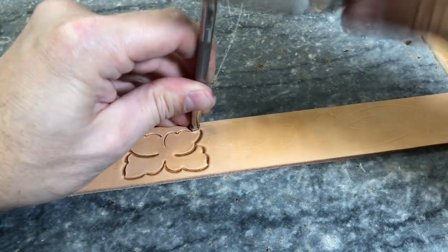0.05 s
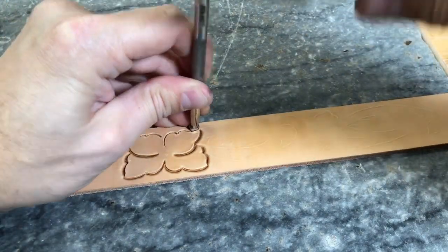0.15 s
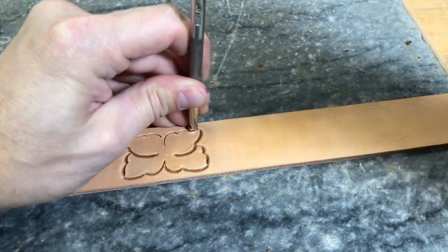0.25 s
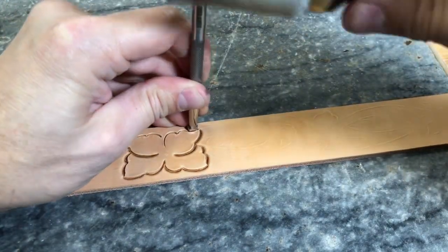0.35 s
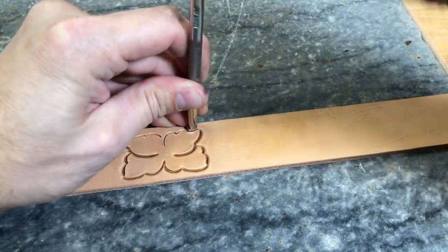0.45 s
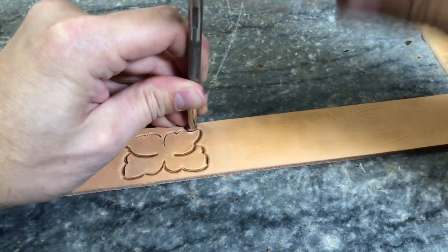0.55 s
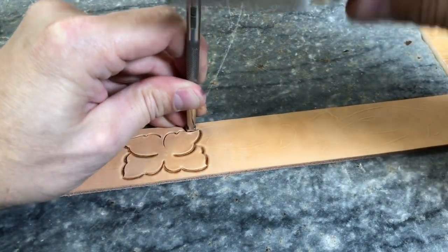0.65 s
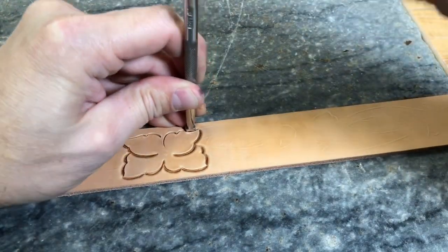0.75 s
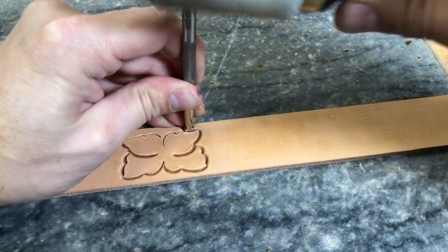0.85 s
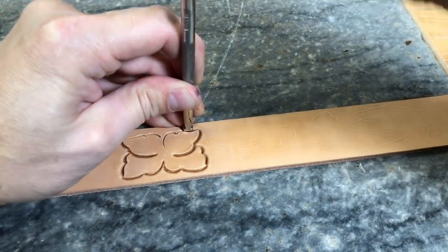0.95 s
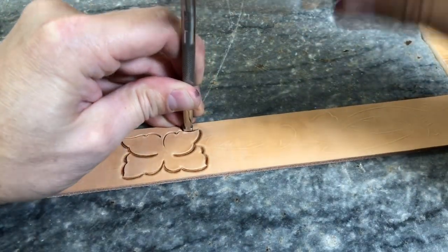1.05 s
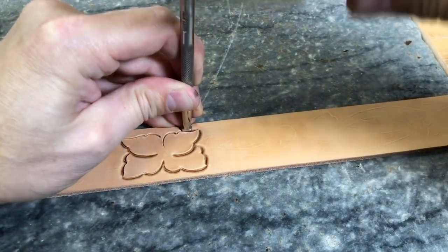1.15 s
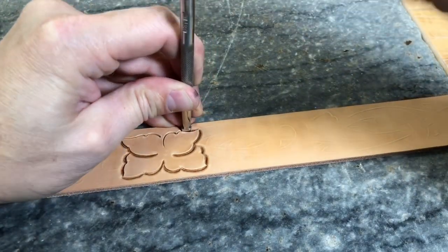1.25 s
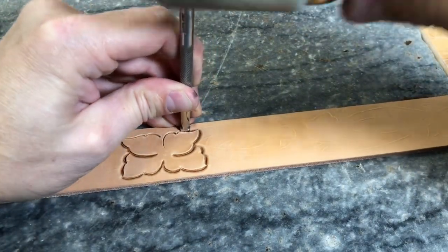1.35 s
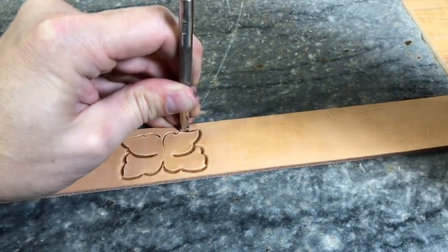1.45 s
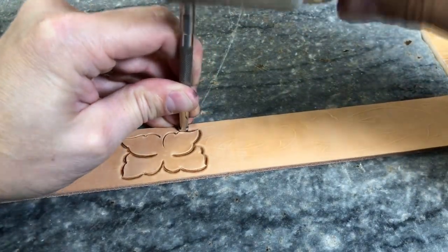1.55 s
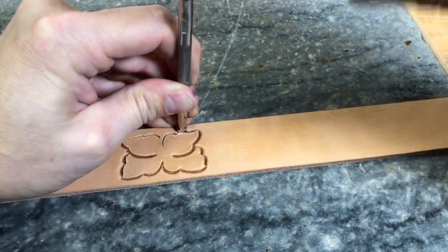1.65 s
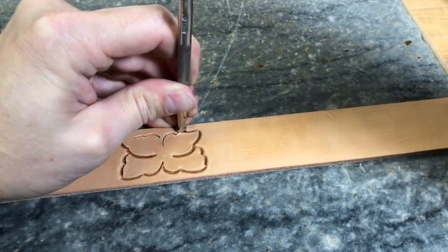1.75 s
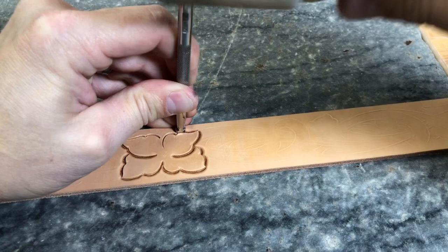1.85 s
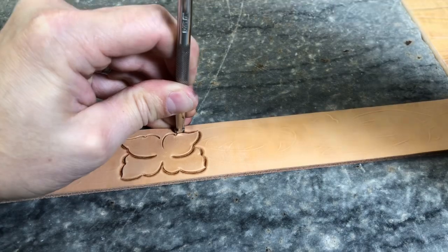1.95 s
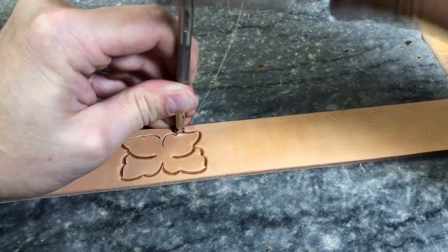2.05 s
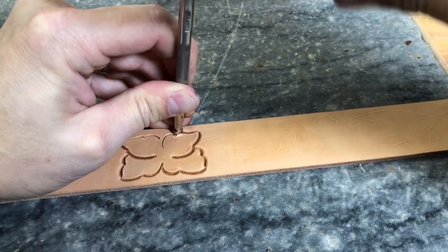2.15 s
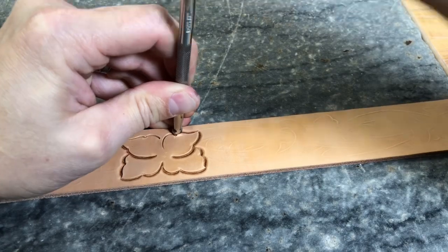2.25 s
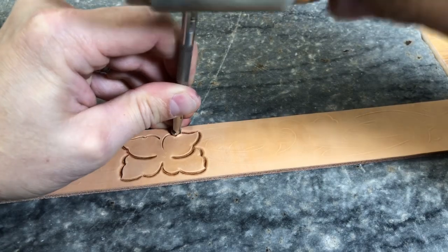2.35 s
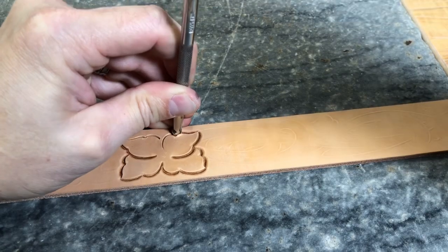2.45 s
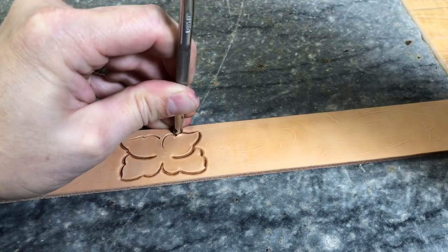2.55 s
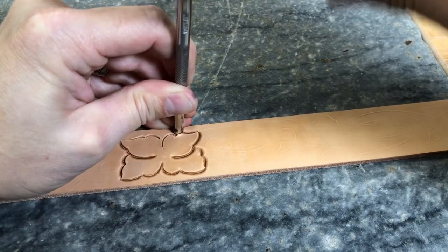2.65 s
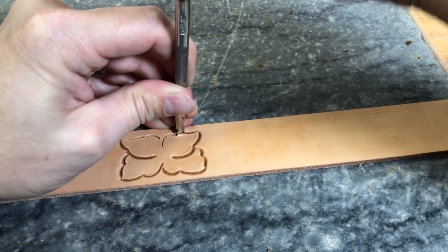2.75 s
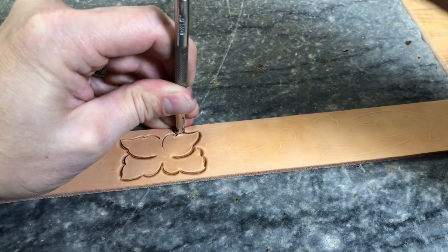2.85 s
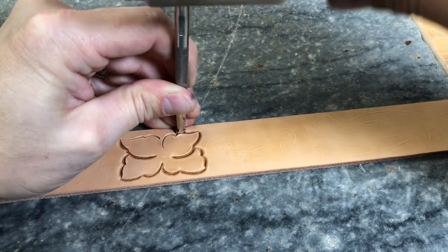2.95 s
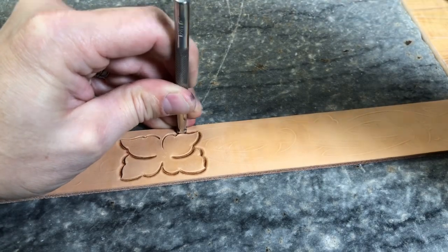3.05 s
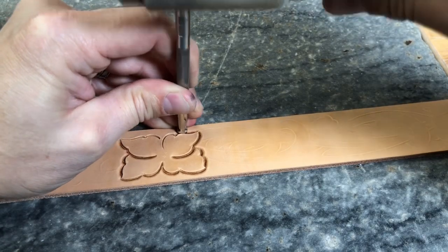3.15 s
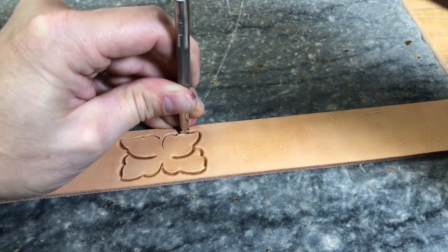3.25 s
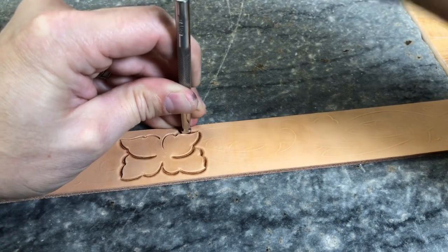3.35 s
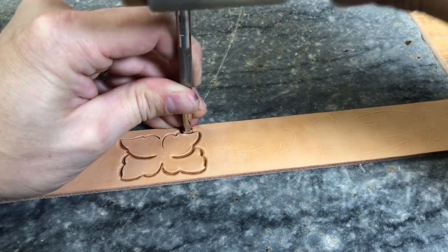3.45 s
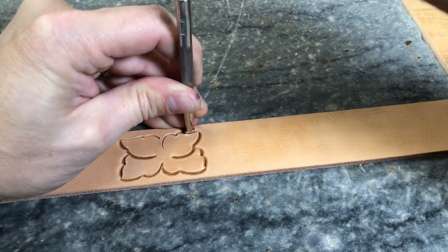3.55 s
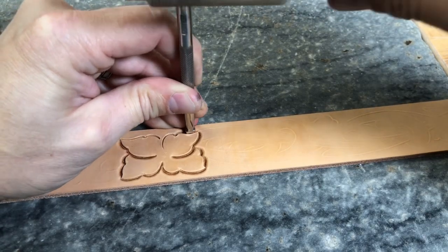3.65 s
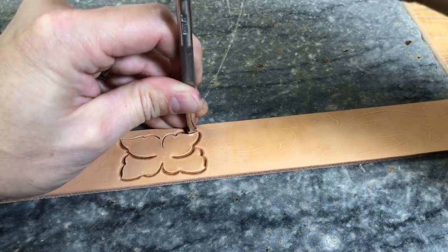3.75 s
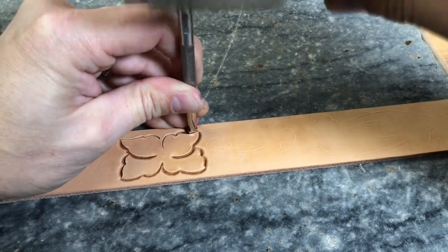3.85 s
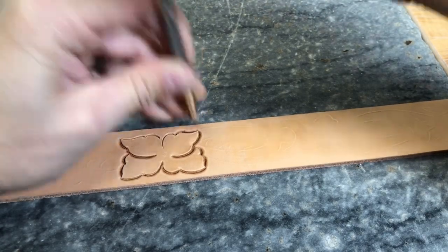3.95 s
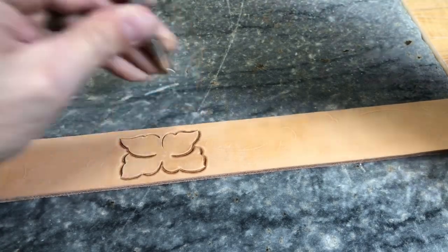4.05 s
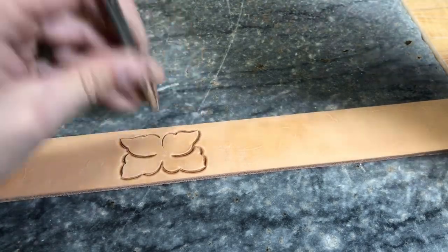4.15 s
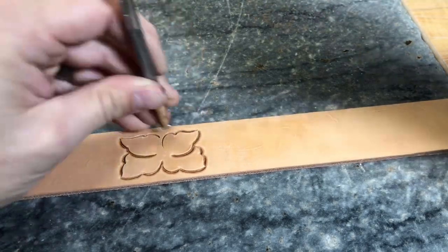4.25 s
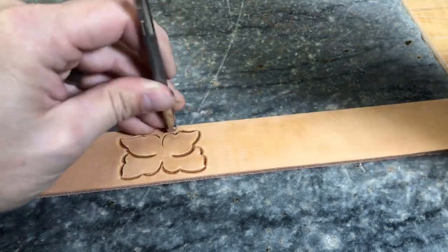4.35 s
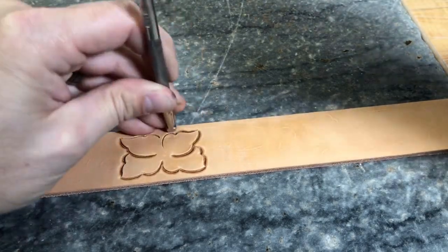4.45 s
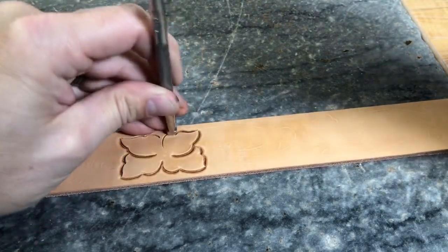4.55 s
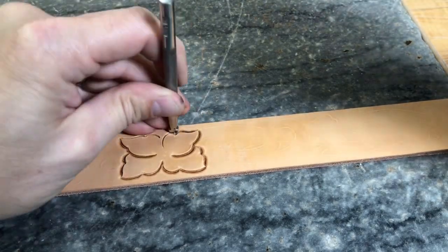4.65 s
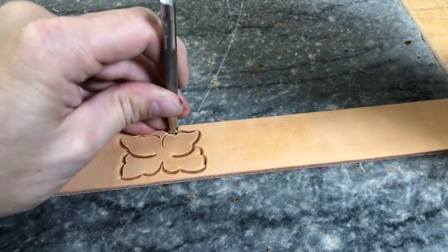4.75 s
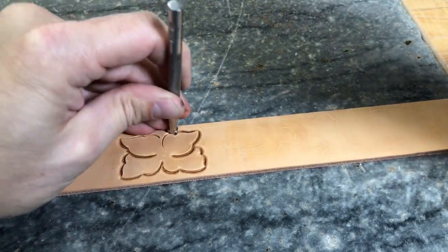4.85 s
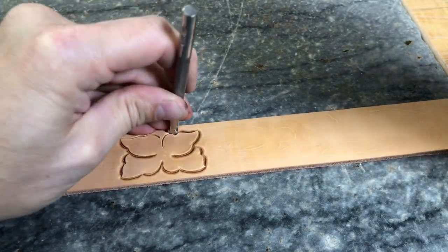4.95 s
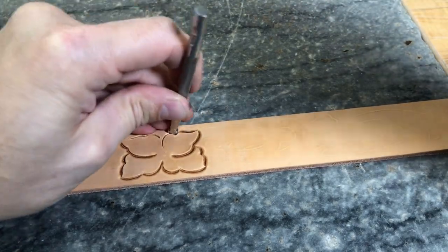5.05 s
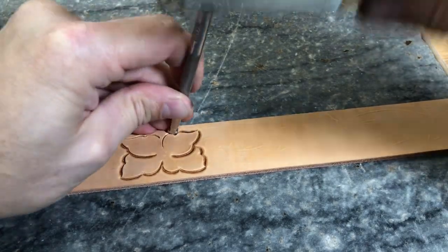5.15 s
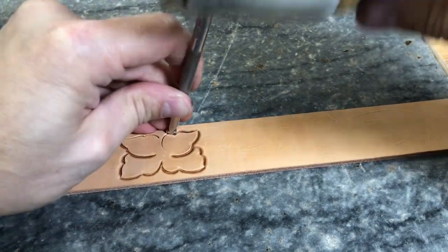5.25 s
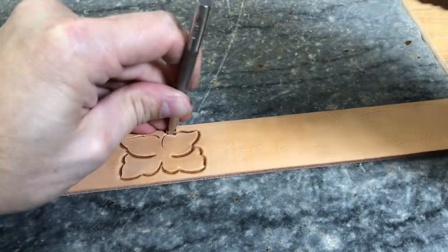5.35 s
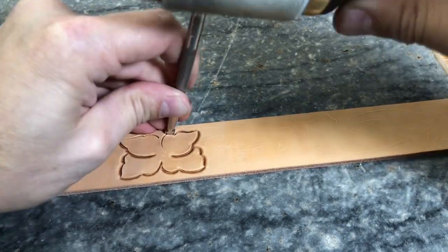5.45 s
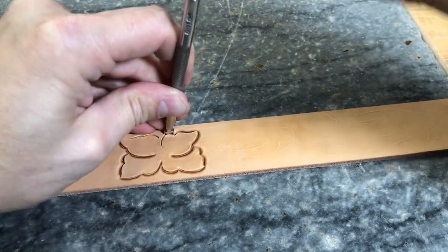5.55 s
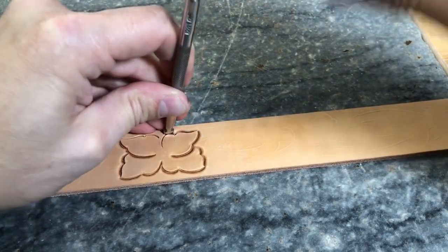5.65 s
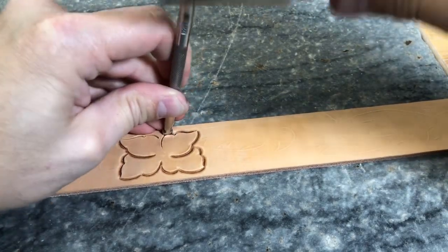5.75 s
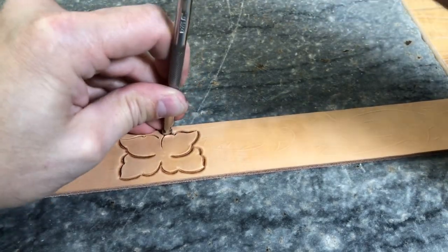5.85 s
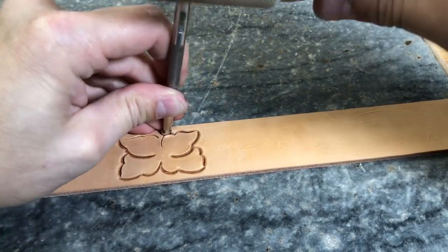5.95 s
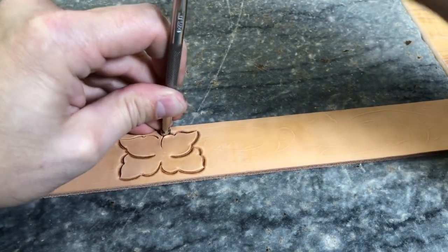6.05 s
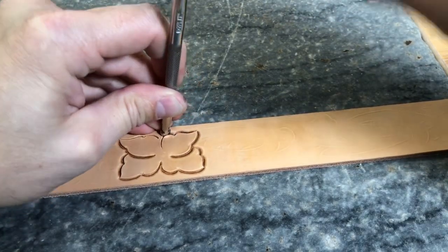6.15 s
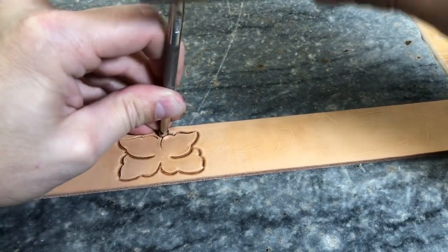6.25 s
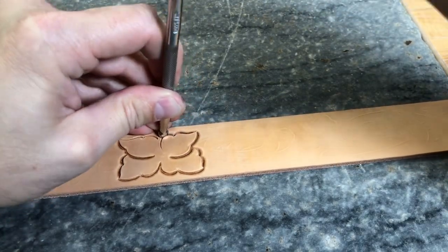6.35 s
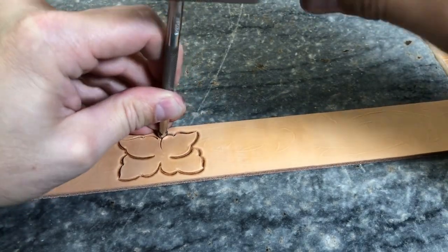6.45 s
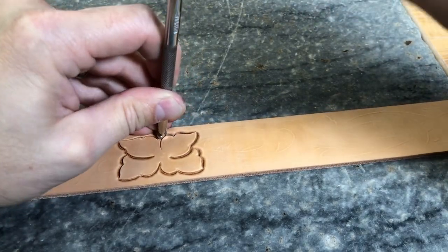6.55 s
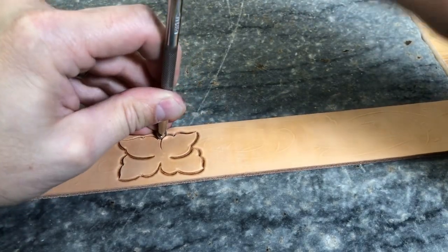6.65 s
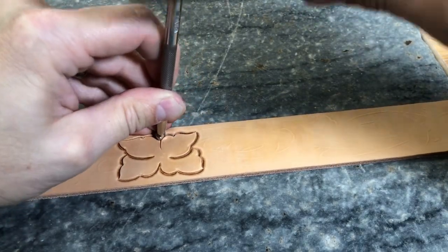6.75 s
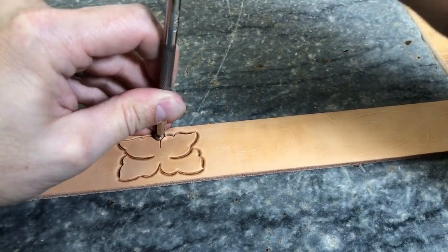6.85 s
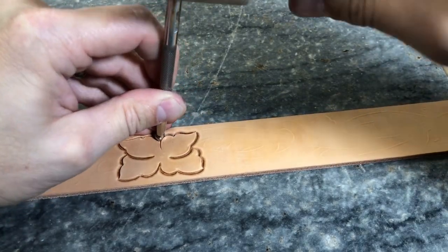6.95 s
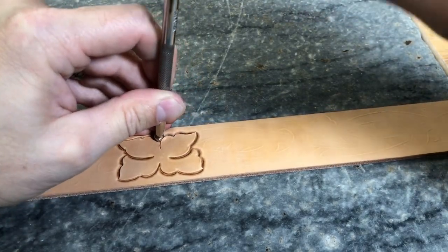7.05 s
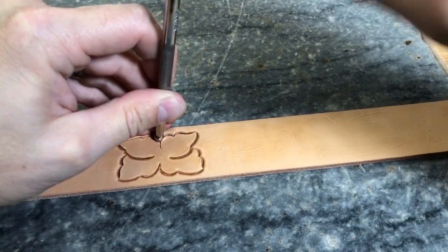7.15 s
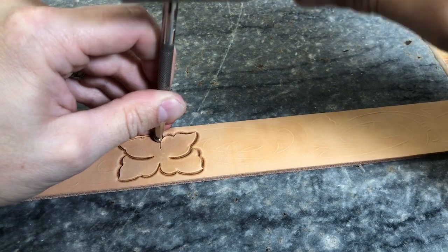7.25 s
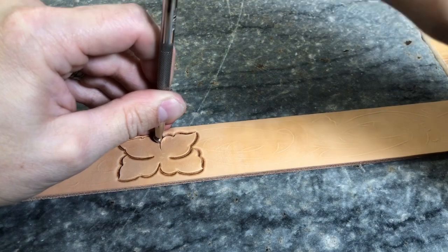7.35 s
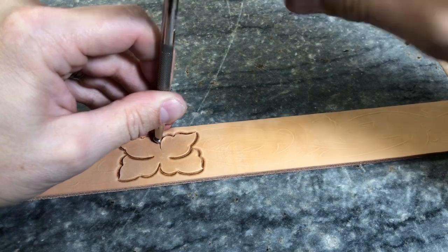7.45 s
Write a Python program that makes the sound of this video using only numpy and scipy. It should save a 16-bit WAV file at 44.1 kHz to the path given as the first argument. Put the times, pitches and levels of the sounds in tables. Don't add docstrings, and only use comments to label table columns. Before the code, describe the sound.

A close microphone in a quiet workshop with soft low air and rumble. From the very start a plastic mallet taps a steel stamping tool into leather on a stone slab, roughly every 0.25 s. Each blow is a very short bright crack with a faint metallic shank ring, a dull bench thump and a brief room tail; the hardest slightly overload. Around 0.9 to 1.2 s, distant tools and a box clatter and a steel rack jangles high and shimmering. A weak tap at 2.6 s follows a slightly longer gap, then firm strokes continue until 3.8 s. During the pause, at about 4.2 to 5 s, things knock, slide and jingle further off. A light tap at 5.15 s restarts the rhythm, with another soft jangle near 5.5 s; even blows, more mid-toned and clacky from 6.4 s, continue to the last at 7.4 s.

```python
import sys
import numpy as np
from scipy import signal
from scipy.fft import rfft, irfft, next_fast_len
from scipy.io import wavfile
from scipy.ndimage import uniform_filter1d

SR = 44100
rng = np.random.default_rng(int(sys.argv[2]) if len(sys.argv) > 2 else 0)


def ratio_of_db(decibels):
    return 10 ** (np.asarray(decibels, float) / 20)


def waveform_to_disk(signal):
    frames = np.transpose(np.atleast_2d(signal))
    scaled = np.clip(frames, -1, 1) * 32767
    samples = np.round(scaled).astype(np.int16)
    wavfile.write(sys.argv[1], SR, samples)


N = 330146


def evened(x):
    return x / np.sqrt(np.mean(x ** 2) + 1e-20)


def read(points, hz):
    point_hz, value = np.transpose(points)
    return np.interp(np.log(hz + 1), np.log(point_hz + 1), value)


def add(mix, start_s, sound):
    part = mix[max(round(start_s * SR), 0):][:len(sound)]
    part += sound[:len(part)]


def hiss(size, colour_db):
    padded = 2 * next_fast_len(size // 2 + 1, True)
    hz = np.fft.rfftfreq(padded, 1 / SR)
    spectrum = rfft(rng.standard_normal(padded)) * ratio_of_db(colour_db(hz))
    return evened(irfft(spectrum, padded)[:size])


def resonate(x, hz, width_hz):
    r = np.exp(-np.pi * width_hz / SR)
    pole = r * np.exp(2j * np.pi * hz / SR)
    return 2 * signal.lfilter([1 - r], [1, -pole], x).real


def fuzzy(drive, hz, width_hz):
    return resonate(drive, hz, width_hz) / np.sqrt(2 * np.pi * width_hz / SR)


# pitch_hz, level_db_per_hz
AIR_COLOUR = [(30, -25.5), (55, -4), (85, 3.5), (125, -1.5), (200, -6), (300, -3), (500, -12.5), (900, -18),
              (1500, -24.5), (3200, -31.5), (5000, -36.5), (8350, -35.5), (14700, -46), (16500, -49.5)]
# time_s, level_db
RUMBLE_LEVEL = [(0.0, -42), (2.73, -46.5), (3.04, -39.5), (4.08, -47.5), (5.9, -42.5), (6.71, -46.5),
                (6.86, -39), (7.49, -41.5)]


def background():
    air = hiss(N, lambda hz: read(AIR_COLOUR, hz))
    rumble = hiss(N, lambda hz: -40 * abs(np.log2((hz + 1) / 35)) ** 1.5)
    rumble = rumble / uniform_filter1d(rumble ** 2, 3000) ** .08
    rumble_db = np.interp(np.arange(N) / SR, *np.transpose(RUMBLE_LEVEL)) + 4.5
    return ratio_of_db(-53) * air + ratio_of_db(rumble_db) * evened(rumble)


CRACK_TONES = {"dull": [(830, -4, 0.0028), (1223, 0, 0.0015)], "middle": [(1746, -7, 0.0024),
               (2046, 6, 0.0017)], "main": [(2766, -6.5, 0.004), (3185, -8.5, 0.0089), (3603, -3.5, 0.0021),
               (4210, -11, 0.0031), (4864, -4.5, 0.0022), (5450, -5.5, 0.0026), (6050, -4, 0.0024)],
               "bright": [(6645, -3, 0.0036), (7400, 0.5, 0.0021), (8230, -3.5, 0.0034),
               (8985, 4.5, 0.0018), (10230, -8, 0.0013), (11080, -6, 0.0023), (12140, -9.5, 0.0038),
               (14500, -13.5, .003), (16000, -17, .003), (14500, -19, .003)]}


def crack(db, **group_db):
    luck_db = 1.8
    t = np.arange(600) / SR
    swell = np.where(t < .0011, 1 - t / .0014, -.39 * (t / .0011 - 1))
    rise = (t / .001) ** .85 * np.exp(swell)
    grit = hiss(600, lambda hz: -30 * ((hz < 5000) | (hz > 15800)))
    burst = ratio_of_db(group_db["bright"] - 4.5) * grit * np.exp(-(t / .0036) ** 2)
    for group, tones in CRACK_TONES.items():
        chances = rng.uniform(-1.206, 1, (len(tones), 3))
        for (pitch_hz, tone_db, length_s), (detune, phase, luck) in zip(tones, chances):
            wave = np.sin(2 * np.pi * pitch_hz * (1 + .03 * detune) * t + np.pi * phase)
            level = ratio_of_db(group_db[group] + tone_db + luck_db * luck)
            burst += level * wave * np.exp(-(t / length_s) ** 2)
    return ratio_of_db(db) * rise * burst


# pitch_hz, width_hz, level_db, t60_s
SHANK_RINGS = [(3780, 110, -29, .33), (3350, 200, -35, .33), (6150, 150, -41, .22), (12300, 250, -47, .12)]


def shank():
    t = np.arange(SR // 3) / SR
    shake = rng.standard_normal(len(t)) * np.clip(t / .0027, 0, 1)
    out = np.zeros(len(t))
    for pitch_hz, width_hz, level_db, t60_s in SHANK_RINGS:
        out += ratio_of_db(level_db - 60 * t / t60_s) * fuzzy(shake, pitch_hz, width_hz)
    return out


# pitch_hz, level_db, t60_s
BENCH_MODES = [(36, -3.5, 0.11), (70, -21, 0.22), (100, -16.5, 0.6), (118, -17, 0.64), (155.1, 0.5, 0.26),
               (227, -12, 0.13), (229, -3.5, 0.8), (265.9, 3, 0.43), (302, 1, .35), (328.1, -3, 0.4),
               (380, -5, 0.4), (393, -5, 0.14), (411, -3, 0.34), (478, 2, 0.12), (471.9, 0, 0.18),
               (558, -9, 0.15), (510, -20.5, 0.083), (587, -12.5, 0.22), (642, -4, 0.2), (715, -16.5, 0.11),
               (780, -7, .12), (850, -13, 0.25), (814.4, -12, 0.12), (900, -21, 0.05)]


def bench_modes():
    t = np.arange(SR // 2) / SR
    return np.array([ratio_of_db(level_db - 60 * t / min(t60_s, .48)) * np.sin(2 * np.pi * pitch_hz * t)
                     for pitch_hz, level_db, t60_s in BENCH_MODES])


# delay_s, level_db
PUSH_ECHOES = [
    (.0078, -11),
    (.0275, -17),
]


def thump(ringing):
    t = np.arange(SR // 2) / SR
    push = -np.sin(np.pi * np.clip((t - .0004) / .0023, 0, 1)) ** 2
    rebound = .2 * np.sin(np.pi * np.clip((t - .0022) / .0062, 0, 1)) ** .5
    humps = .36 * np.exp(-((t - .0033) / .0007) ** 2)
    humps += .1 * np.exp(-((t - .0053) / .0005) ** 2)
    humps += .22 * np.exp(-((t - .0074) / .0006) ** 2)
    out = push + rebound + humps - ratio_of_db(-23.5) * ringing * (1 - np.exp(-t / .0064))
    for delay_s, level_db in PUSH_ECHOES:
        add(out, delay_s, ratio_of_db(level_db) * push[:300])
    return out


# pitch_hz, level_db
BOOM_COLOUR = [(60, -15.5), (150, -1.5), (260, 0), (450, -1), (620, -8), (900, -27), (1500, -51.5)]


def boom():
    t = np.arange(SR // 2) / SR
    fade = ratio_of_db(-60 * t / .25) * np.clip((t - .006) / .004, 0, 1)
    return hiss(len(t), lambda hz: read(BOOM_COLOUR, hz)) * fade


# pitch_hz, t60_s
ROOM_T60 = [(200, 0.72), (1000, 0.24), (3000, 0.26), (8000, 0.24), (16000, 0.36)]
# pitch_hz, level_db
ROOM_TONE = [(300, -10.5), (700, 2), (1400, 0.5), (2300, 7.5), (3600, 9.5), (5000, -2), (8000, -10.5),
             (12000, -26), (16000, -21.5)]


def workshop(middle_db):
    patchy_db = 2.5
    taps = np.zeros(SR // 2)
    at = np.arange(0, len(taps) - 10, 10) + rng.integers(0, 10, (len(taps) - 1) // 10)
    taps[at] = rng.choice([-1., 1.], at.shape)
    hz, t, z = signal.stft(taps, SR, nperseg=256)
    colour_db = read(ROOM_TONE, hz) + .21 * (middle_db + 16) * np.exp(-((hz - 2100) / 600) ** 2)
    patches = uniform_filter1d(rng.standard_normal(z.shape), size=4, axis=0)
    patches = evened(uniform_filter1d(patches, size=9, axis=1))
    decay_db = -60 * t / read(ROOM_T60, hz)[:, None]
    z = z * ratio_of_db(colour_db[:, None] + patchy_db * patches + decay_db)
    tail = signal.istft(z, SR, nperseg=256)[1]
    late_s = np.arange(len(tail)) / SR
    tail = tail * np.clip(late_s / .011, 0, 1) ** 1.5
    tail = tail * (1 + .4 * np.exp(-((late_s - .0135) / .004) ** 2))
    return tail / np.sqrt(np.mean(tail[:4410] ** 2))


# delay_s, level_db
NEAR_ECHOES = [
    (.0036, -12.5),
    (0.0098, -17),
    (0.013, -23.5),
]
BLOWS = [(0.0345, -6, -21.5, 5, -4.5), (0.2945, -0.5, -21, -6.5, -4), (0.5427, 1, -20, 2, -11),
         (0.7867, -3, -20.5, 0, -7), (1.036, -3, -21, -2.5, -6), (1.277, -2.5, -19.5, 1, -4.5),
         (1.5287, -3, -20, -1, -5.5), (1.7822, -2, -19, -2.5, -1.5), (2.0335, -2, -19, -5, -1),
         (2.2835, -6.5, -20.5, 3.5, -6.5), (2.6443, -13, -27, 1, -3), (2.8748, -6, -20, 2.5, -6.5),
         (3.1245, -4, -20, -1.5, -2.5), (3.362, -4.5, -21.5, -2.5, -8.5), (3.6033, -5, -22.5, -3, -6),
         (3.8311, -4.5, -24.5, 0, -5),
         (5.1473, -18.5, -28.5, 6.5, 1),
    (5.4001, -6.5, -23, 5.5, -20),
    (5.6529, -2, -20.5, -0.5, -5),
    (5.9074, -4.5, -20.5, -4.5, -5),
    (6.1574, -2, -19, -3, -5.5),
    (6.4104, -3.5, -20.5, 4.5, -10),
    (6.658, -2, -20, 4, -8.5),
    (6.9069, -3, -20.5, 5.5, -8.5),
    (7.1606, -1.5, -20, 6, -10),
    (7.4031, -2.5, -20.5, 4, -10),
]


def mallet():
    usual_weight_db, usual_grip_db = -17, -6
    bench_luck_db = 2.5
    rock_hz, rock_rise_s, rock_t60_s = 36, .02, .4
    out, t = np.zeros(N), np.arange(SR // 3) / SR
    modes, wash = bench_modes(), ratio_of_db(-17.5) * boom()
    rocking = ratio_of_db(-6 - 60 * t / rock_t60_s) * (1 - np.exp(-t / rock_rise_s))
    for start_s, crack_db, thump_db, slant_db, grip_db in BLOWS:
        weight_db = thump_db - crack_db - usual_weight_db
        dull_db = -19.5 - .3 * slant_db + .65 * weight_db + .6 * max(grip_db - usual_grip_db, -5)
        middle_db = -15 + slant_db + .38 * weight_db
        bright_db = -13 - .22 * slant_db

        top = crack(crack_db - 6, dull=dull_db + 11.5, middle=middle_db + 8.5,
                    main=-2.5, bright=bright_db + 3)
        add(out, start_s - .00075, top)
        for delay_s, echo_db in NEAR_ECHOES:
            add(out, start_s + delay_s, ratio_of_db(echo_db) * uniform_filter1d(top, size=4))
        add(out, start_s, ratio_of_db(crack_db + grip_db) * shank())

        ringing = ratio_of_db(bench_luck_db * rng.standard_normal(len(modes))) @ modes
        low = thump(ringing) + wash + ratio_of_db(-28.5) * boom()
        add(out, start_s - .0006, ratio_of_db(thump_db + 14) * low)
        rock = np.sin(2 * np.pi * rock_hz * rng.uniform(.9, .95) * t)
        add(out, start_s, ratio_of_db(thump_db - 7.5) * rocking * rock)
        add(out, start_s, ratio_of_db(.5 * (crack_db + thump_db) - 27) * workshop(middle_db))
    return out


# pitch_hz, level_db_per_hz
CLATTER_COLOUR = [(120, -53), (200, -23.5), (538, -1.5), (601, -4.5), (791, -4), (2210, -7), (4120, -7.5),
                  (8420, -15), (14900, -28.5), (16000, -70.5)]


def tilted(tilt_db):
    return lambda hz: read(CLATTER_COLOUR, hz) + tilt_db * np.log2((hz + 100) / 3000)


KNOCKED_THINGS = {"bounce": (-4, 1850, 13), "tools": (-1, 3600, 7), "box": (-5, 760, 10),
                  "tray": (-3.4, 1080, 2.7), "cup": (4, 1325, 24), "tin": (-3, 2390, 28),
                  "peg": (-4, 4050, 11), "jar": (-1.2, 2430, 10), "lid": (-2, 2850, 14),
                  "pins": (19, 11000, 3), "keys": (18, 2500, 0.1), "rail": (-1.5, 5300, 8)}
BENCH_TICKS = {"bounce": [(.070, -26.5, .034), (.333, -25.5, .028), (1.580, -29, .03), (2.322, -33, .03),
               (5.690, -35, .04), (5.950, -35, 0.09), (6.197, -35.5, .04), (6.455, -28.5, .022),
               (6.950, -35, .03), (7.445, -30, .03)], "pins": [(2.335, -41, .021), (2.343, -40, 0.019),
               (3.896, -56, .022), (3.948, -49, 0.026)]}
FAR_KNOCKS = {"tools": [(.865, -12, 0.26), (1.103, -21.5, 0.37), (4.732, -37.5, .31)],
              "peg": [(2.552, -52, .03), (4.546, -48, 0.21), (4.930, -53, 0.29)], "box": [(.860, -15, 0.19),
              (1.110, -19.5, .15), (1.226, -27.5, 0.34), (1.637, -30.5, 0.19), (4.295, -24, 0.094),
              (6.620, -50.5, 0.19)], "tray": [(4.182, -35.5, .54), (4.297, -32.5, 0.33)],
              "cup": [(.935, -26.5, 0.14), (5.557, -40, 0.32)], "tin": [(4.855, -45.5, .32),
              (4.927, -47, .4), (4.995, -45, 0.32)], "lid": [(.129, -37.5, 0.41), (.489, -45.5, .22)],
              "jar": [(4.744, -40, 0.4), (5.996, -41, 0.31)], "keys": [(4.184, -41, .6), (4.241, -42, .4),
              (5.469, -45.5, .95)], "rail": [(.868, -17, 0.42), (1.106, -26, .4)]}


def knocks():
    out = np.zeros(N)
    lowpass = signal.butter(2, 6000, fs=SR)
    for thing, rows in (BENCH_TICKS | FAR_KNOCKS).items():
        tilt_db, body_hz, body_db = KNOCKED_THINGS[thing]
        t = np.arange(SR // 2 if thing in FAR_KNOCKS else SR // 8) / SR
        for start_s, level_db, t60_s in rows:
            wash = hiss(len(t), tilted(tilt_db))
            body = resonate(wash, body_hz, 60 + .08 * body_hz)
            wash = evened(wash + ratio_of_db(body_db) * body)
            dull = signal.lfilter(*lowpass, wash)
            wash = dull + (wash - dull) * ratio_of_db(-25 * t / t60_s)
            lumps_db = 1.2 * evened(uniform_filter1d(rng.standard_normal(len(t)), 260))
            rise = 1 - np.exp(-t / min(.004, .0069 * t60_s))
            add(out, start_s, ratio_of_db(level_db + lumps_db - 60 * t / t60_s) * rise * wash)
    return out


# middle_s, level_db, half_length_s, tilt_db_per_octave
SLIDE_EVENTS = [(0.095, -48, 0.017, 32), (0.152, -35, 0.037, 3), (0.187, -46.5, 0.064, 2),
                (1.261, -33.5, 0.03, 1), (1.352, -41, 0.072, -2), (1.666, -56.5, 0.074, 2.5),
                (2.532, -50, 0.039, -13), (3.342, -68.5, .04, 7), (3.501, -66.5, 0.04, 11),
                (4.102, -60, 0.051, 3), (4.361, -51, 0.084, -3), (4.605, -57.5, 0.036, 1.5),
                (5.085, -64, 0.031, 10), (5.53, -43.5, 0.085, -3.5), (6.115, -61.5, 0.035, 1)]


def slides():
    out, t = np.zeros(N), np.arange(N) / SR
    for middle_s, level_db, half_s, tilt_db in SLIDE_EVENTS:
        near = slice(max(round((middle_s - .25) * SR), 0), round((middle_s + .25) * SR))
        swell = np.exp(-((t[near] - middle_s) / half_s) ** 2)
        out[near] += ratio_of_db(level_db) * swell * hiss(len(swell), tilted(tilt_db))
    return out


# pitch_hz, width_hz, level_db
RACK_PAIRS = [
    [(8010, 16, 0), (8240, 40, -14)],
    [(11110, 25, 0), (11215, 25, -1)],
    [(14220, 40, -4), (14360, 40, 0)],
]
RING_LASTING = (1.2, .7, .6)
# start_s, t60_s, low_db, middle_db, high_db
RACK_JANGLES = [
    (.25, .2, -95.5, -84, -62),
    (.45, .2, -90, -82, -60),
    (.865, 0.73, -43, -43, -44),
    (1.105, .9, -47, -84, -46),
    (1.23, .8, -63, -75, -56),
    (4.19, 0.4, -46, -43, -48),
    (4.24, 0.29, -43, -44, -54),
    (4.3, 0.69, -61, -81, -80.5),
    (5.475, .4, -56, -62, -68),
    (5.557, .5, -60, -45, -53),
]


def rack():
    out, t = np.zeros(N), np.arange(SR * 3 // 5) / SR
    for start_s, t60_s, *levels_db in RACK_JANGLES:
        rattle = rng.standard_normal(len(t)) * np.clip(t / .0061, 0, 1)
        for level_db, lasting, pair in zip(levels_db, RING_LASTING, RACK_PAIRS):
            fading = rattle * ratio_of_db(level_db - 60 * t / (t60_s * lasting))
            for pitch_hz, width_hz, tone_db in pair:
                add(out, start_s, ratio_of_db(tone_db) * fuzzy(fading, pitch_hz, width_hz))
    return out


def scene():
    return (background() + mallet() + knocks() + slides() + rack())[None]


def band_limit(x):
    return signal.sosfilt(signal.butter(12, 16810, fs=SR, output="sos"), x)


def record(dry):
    edge = signal.firwin(191, 16300, window=("kaiser", 8), fs=SR)
    limited = signal.oaconvolve(np.clip(dry, -.95, .95), edge[None], "same")
    return band_limit(limited)


dry = scene()
out = record(dry)
waveform_to_disk(out)
```